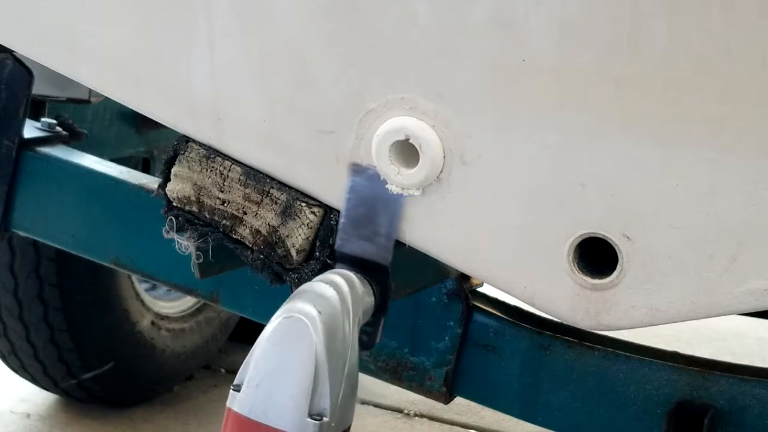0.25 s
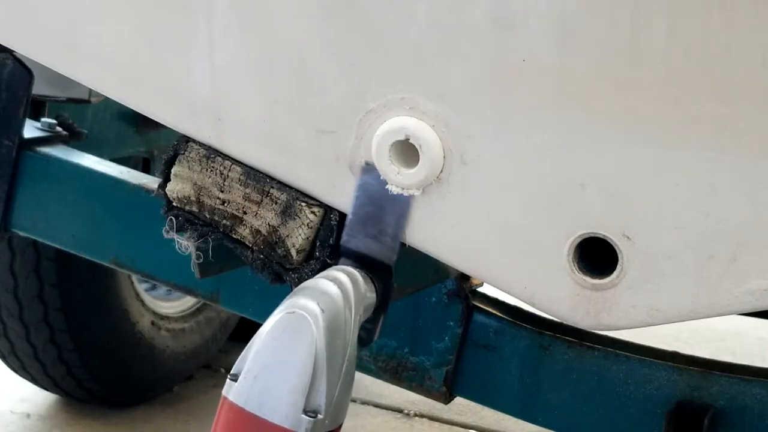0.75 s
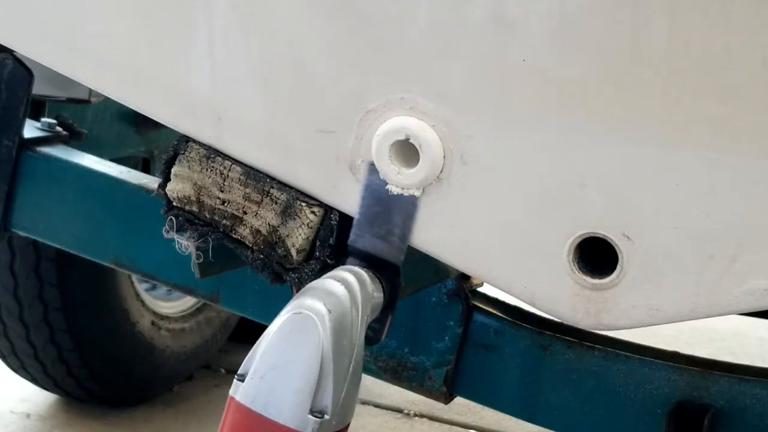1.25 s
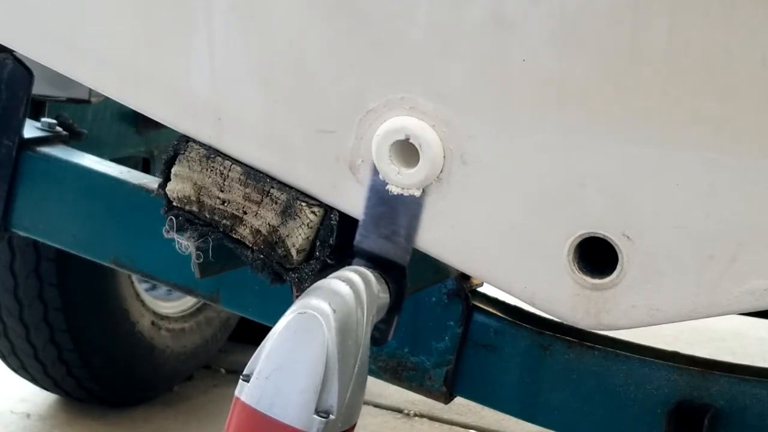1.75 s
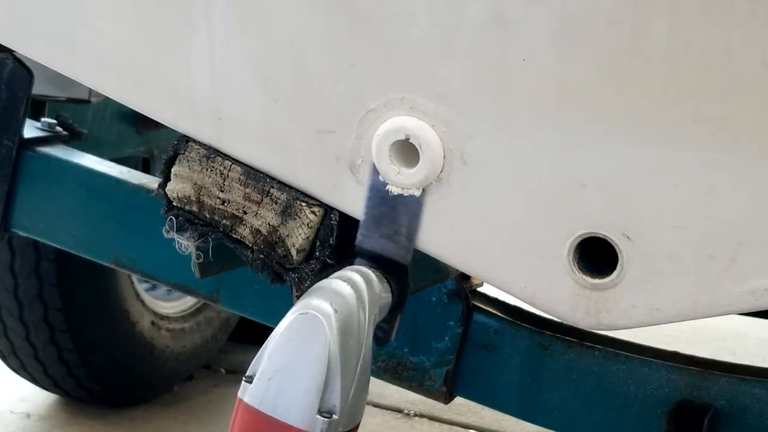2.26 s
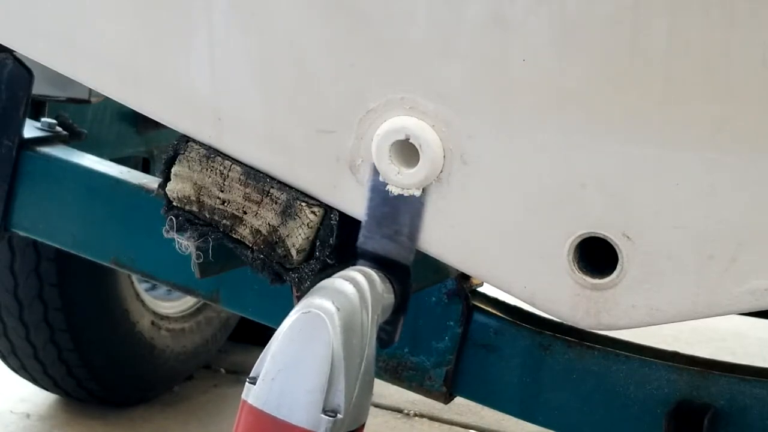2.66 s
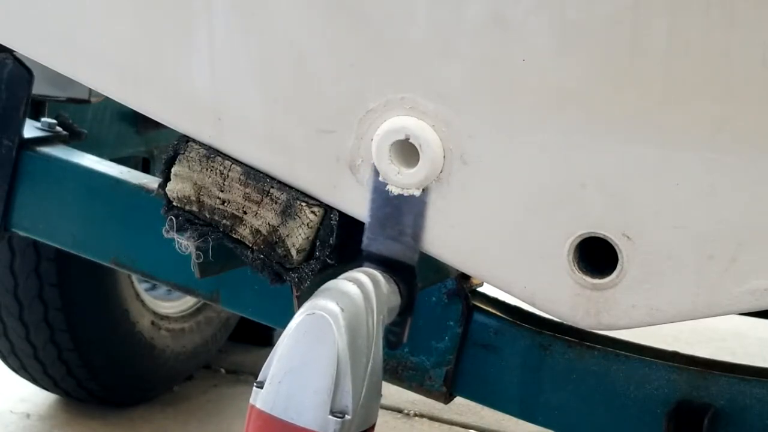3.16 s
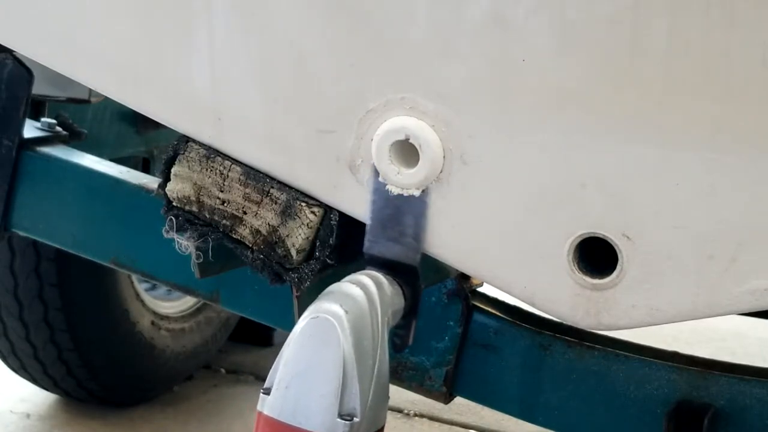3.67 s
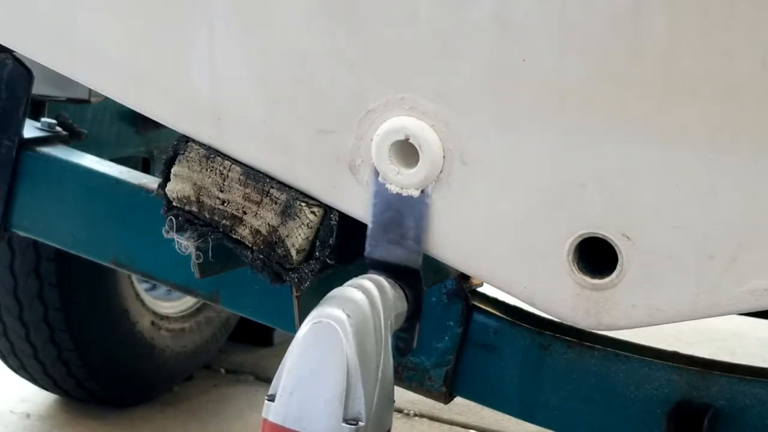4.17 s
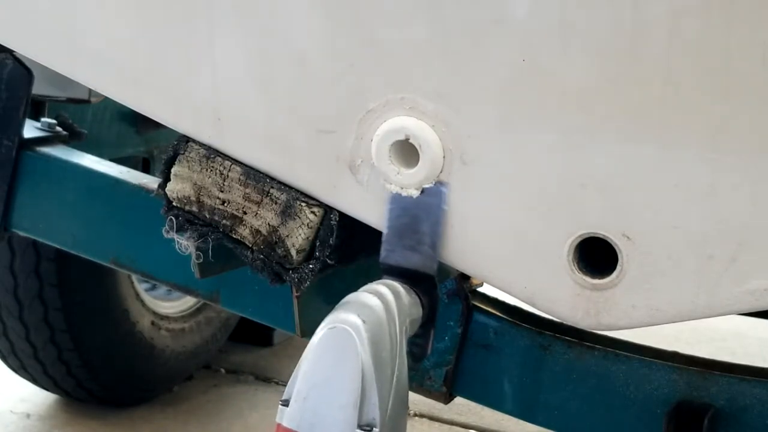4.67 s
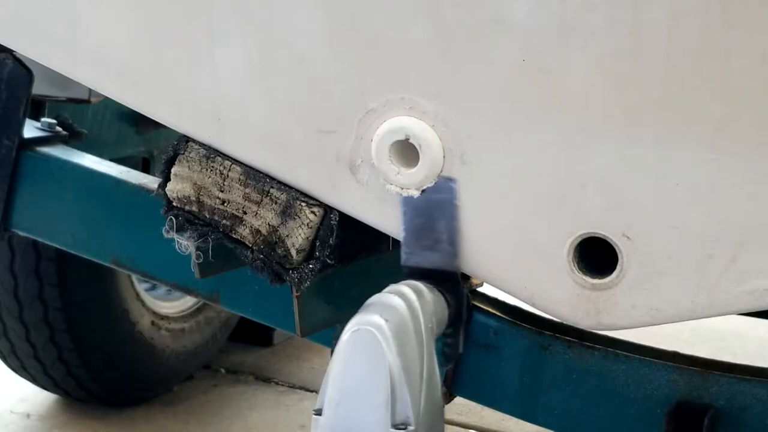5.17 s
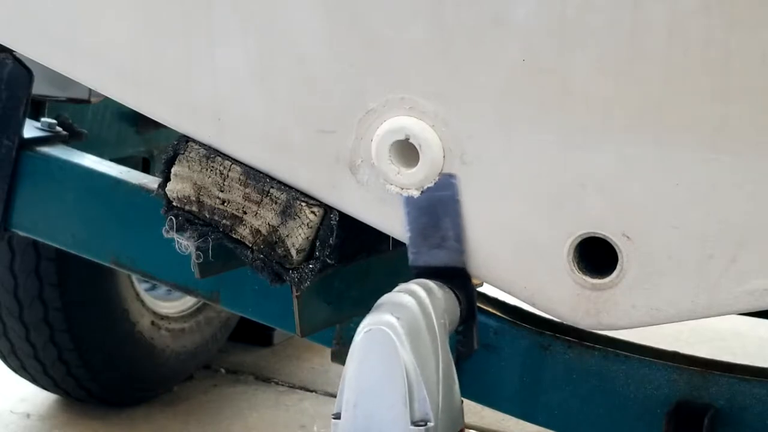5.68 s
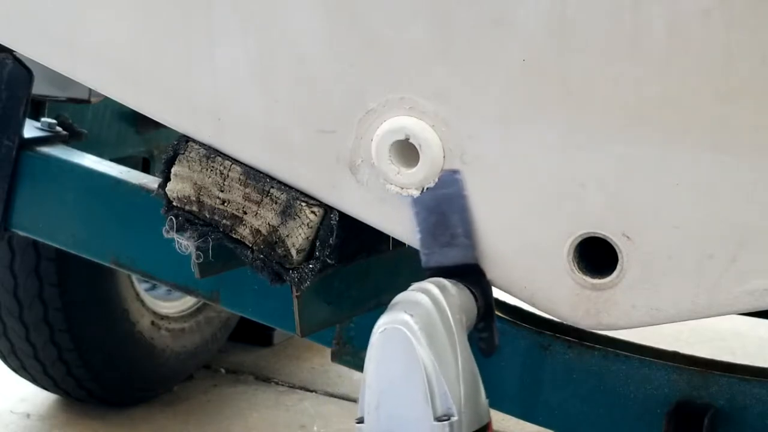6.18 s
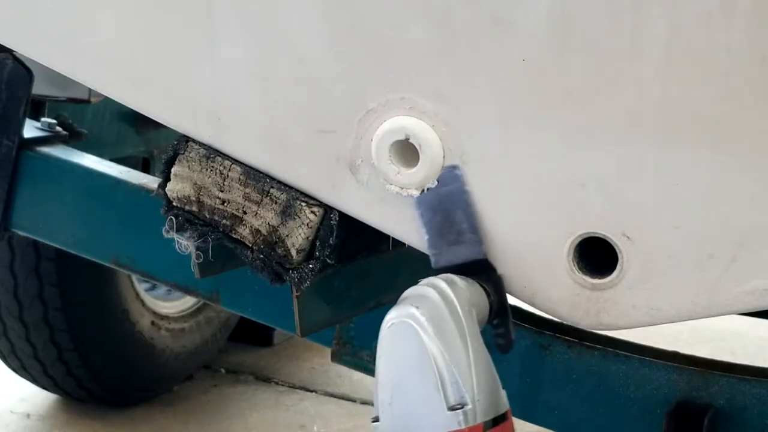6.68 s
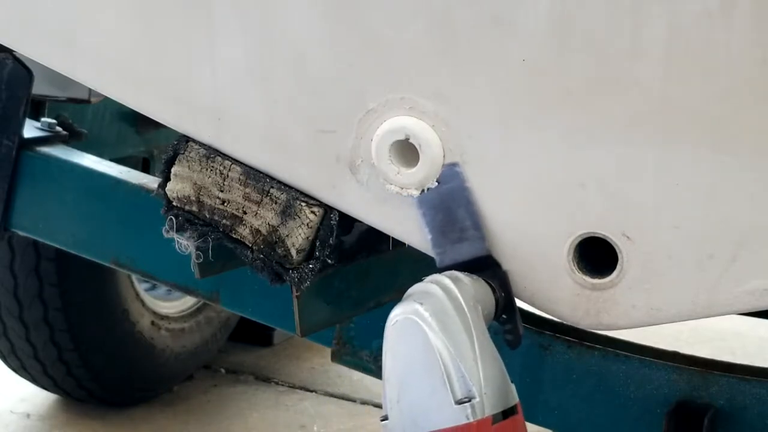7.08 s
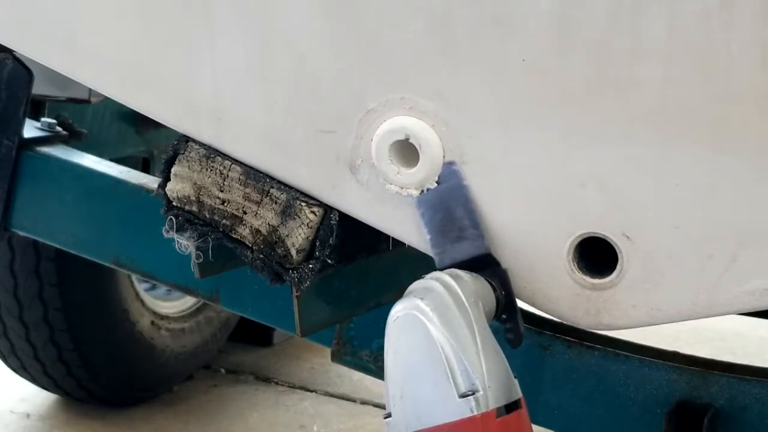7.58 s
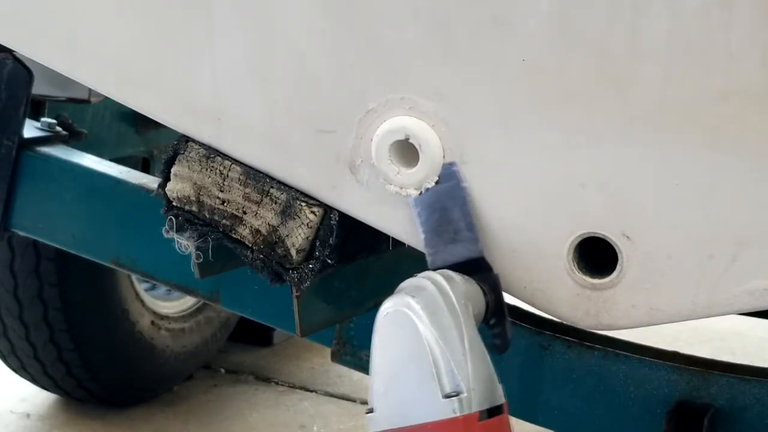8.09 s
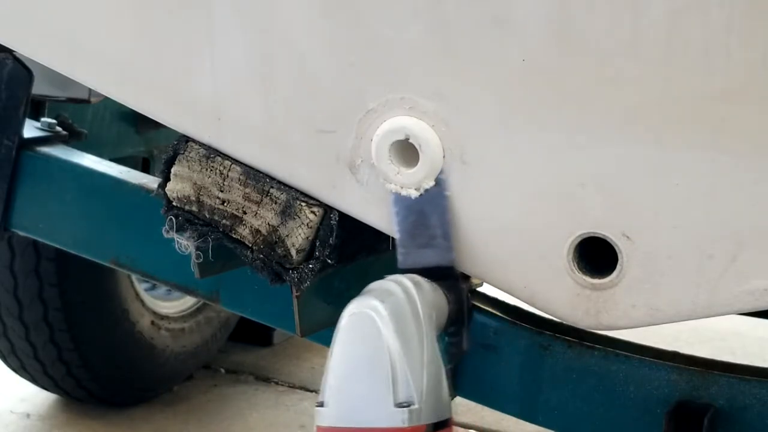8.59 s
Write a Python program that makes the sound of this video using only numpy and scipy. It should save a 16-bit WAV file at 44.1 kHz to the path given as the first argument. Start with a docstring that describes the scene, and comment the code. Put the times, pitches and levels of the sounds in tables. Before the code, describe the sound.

An oscillating multi-tool buzzes harshly against a hollow fiberglass hull, its pitch sagging under load, climbing back, then sagging again with raspy squeals.

```python
"""An oscillating multi-tool saws a plastic fitting off a fiberglass boat hull, outdoors.
Its teeth bite once on each push and pull; these impulses ring the hull, tool head and steel blade.
The blade's swing drives a low drone in the hull, friction gives a pulsing rasp, the motor whines.
Load drags the stroke rate down; it partly recovers, then sags again, and pitched parts glide with it.
At times the blade chatters or squeals, or single harmonics sing out."""
import sys
import numpy as np
from scipy import signal
from scipy.fft import rfft, irfft, next_fast_len
from scipy.io import wavfile
from scipy.ndimage import uniform_filter1d

SR = 44100
rng = np.random.default_rng(int(sys.argv[2]) if len(sys.argv) > 2 else 0)


def master(y):
    """Save y as 16-bit WAV."""
    cut = np.clip(np.atleast_2d(y).T, -1, 1)
    pcm = np.round(cut * 32767)  # scale
    wavfile.write(sys.argv[1], SR, pcm.astype(np.int16))


N = 389844

# Motor speed as it bogs down, then as it partly recovers and sags again.
# Each row: time in seconds, stroke rate in strokes per second.
BOGGING_DOWN = [(0.0, 245.0), (0.25, 248.2), (0.52, 247.3), (0.7, 242.2), (1.1, 217.1), (1.44, 189.0),
                (1.81, 164.6), (1.97, 158.1), (2.55, 140.3)]
RISE_AND_SAG = [(2.68, 140.5), (2.92, 144.2), (3.5, 146.8), (3.79, 157.6), (4.29, 182.6), (4.43, 199.6),
                (4.57, 213.5), (4.81, 222.6), (5.39, 226.6), (6.08, 218.2), (6.59, 217.1), (7.04, 219.0),
                (7.43, 214.8), (8.03, 197.2), (8.75, 188.5), (8.84, 188.6)]
# Pushes of the hand, each lasting until the next.
# Each row: start in seconds, change of the hull drone in dB, change of the buzz in dB.
PUSHES = [(0, 3.5, 1), (.68, -0.5, 1.5), (1.97, -11.5, 0), (2.4, -21, -0.5), (2.58, -7, 0), (4.33, -13, -5),
          (4.775, -1.5, 1), (7.3, 4.5, 0.3)]
# Friction in the cut. Each row: time in seconds, friction as a reference level in dB.
FRICTION = [(0.0, -42), (0.62, -40), (0.86, -32.5), (1.06, -36.5), (2.72, -38), (2.83, -37.5), (4.31, -39),
            (4.36, -47), (4.75, -43), (4.84, -36.5), (5.98, -33.5), (7.05, -34), (7.6, -35.5), (8.84, -38)]
# Spells in which the blade bounces in the slot.
# Each row: start in seconds, end in seconds, relative level in dB, scatter of the bites in strokes.
CHATTER = [(0, .62, -62, 0.0065), (2.15, 3.303, -51, 0.0019), (5.943, 6.3, -44, 0.0045),
           (7.14, 7.38, -42, 0.0076), (7.42, 7.72, -40.5, 0.0077)]
# Spells in which one harmonic sings out.
# Each row: start in seconds, end in seconds, multiple of the stroke rate, level in dB before SINGING_DB.
SINGING_SPELLS = [(.12, .58, 7, -36), (.3, .6, 9, -35), (.56, .79, 8, -30), (.84, 1.03, 8, -30.5),
                  (.85, .97, 9, -31), (1.0, 1.16, 7, -28.5), (1.02, 1.28, 3, -29), (1.17, 1.34, 11, -30),
                  (1.48, 1.99, 6, -29.5), (1.705, 1.87, 11, -27.5), (2.04, 2.26, 8, -33.5),
                  (2.086, 2.27, 13, -30), (2.22, 2.4, 9, -32.5), (2.42, 2.86, 13, -27),
                  (2.3, 3.62, 7, -32.3), (2.85, 3.55, 10, -34.5), (3.85, 4.0, 11, -31),
                  (3.96, 4.2, 13, -33), (4.15, 4.3, 27, -35), (4.78, 5.25, 6, -34), (4.79, 5.62, 7, -32),
                  (5.15, 5.62, 8, -32), (5.6, 5.9, 17, -35), (5.77, 6.11, 7, -28), (5.77, 6.2, 10, -31.5),
                  (5.8, 6.12, 25, -34.5), (6.33, 7.11, 20, -32), (6.5, 6.87, 10, -30.5),
                  (6.55, 6.84, 22, -31), (6.6, 7.3, 8, -32), (6.86, 7.35, 7, -30.5), (7.6, 7.75, 7, -30.5),
                  (7.68, 7.81, 23, -29), (7.73, 7.95, 10, -30.5), (7.8, 8.1, 11, -32.5),
                  (7.83, 8.06, 24, -34), (8.1, 8.7, 9, -27.8), (8.25, 8.52, 26, -34.5),
                  (8.41, 8.714, .5, -45.5)]
# Spells in which the pinched blade squeals. Each row: start in seconds, end in seconds, level in dB.
SQUEAL_SPELLS = [(6.33, 7.15, -34), (7.11, 7.44, -29), (7.41, 7.57, -40), (7.53, 7.8, -31.5),
                 (7.78, 8.84, -40)]
# Resonances of hull, tool head, blade, squealing steel and teeth, then low ones of the hull panel.
# Each row: centre in Hz, width in Hz, relative gain in dB.
HULL_MODES = [(683, 140, -2), (1020, 47, 4.5), (1254, 67, 4.5)]
HEAD_MODES = [(1558, 80, 2.5), (1822, 120, 1.5), (2219, 128, 2.5), (2634, 720, -7.5), (3010, 230, -3.5),
              (4160, 1300, -12)]
BLADE_MODES = [(4350, 240, -6), (4934, 200, 0), (6000, 2100, -12.5)]
SQUEAL_MODES = [(4680, 310, 0.081), (4760, 260, -0.82)]
TOOTH_MODES = [(9760, 350, 2), (10585, 104, 5), (12970, 380, 6.7)]
PANEL_MODES = [(143.7, 11.7, -11.5), (175.8, 36.9, -19), (194.5, 53.5, -20.5), (288, 50, -28),
               (461, 15, -42), (586.4, 84, -36), (681.2, 84, -25), (848.5, 91, -21), (898.3, 36, -18)]
# Swing of the blade, one row for each harmonic from 1 to 4.
# Each row: drive into the hull in dB, level straight from the tool in dB, unsteadiness in dB.
SWING = [(0, -51.5, -48.5), (0, -50.5, -56), (2.5, -45.5, -56), (-9, -51.5, -52)]
# Spectral shapes of the friction noises. Each row: frequency in Hz, relative density in dB per Hz.
GRIND_SPECTRUM = [(30, -18), (170, -11.5), (330, -17.5), (520, -0.5), (850, -0.5), (1900, 2.5), (3800, -2),
                  (4700, -3), (5400, -21), (7200, -21), (15000, -27)]
DUST_SPECTRUM = [(4000, -12), (5600, -1.5), (7300, -12.5), (8600, -9.5), (9700, 0), (10400, -1), (10630, 2),
                 (11000, -5.5), (12200, -6.5), (12850, -14), (13300, -12), (15600, -20)]
# Likeness of left and right noise. Each row: frequency in Hz, correlation.
LIKENESS = [(100, .97), (600, 0.15), (1400, 0.31), (6000, 0.33), (15000, 0.43)]

FREE_HZ, BOGGED_HZ = 248, 140   # stroke rate with no load and with full load
WHINE_RATIO = 2.6   # whine frequency over stroke rate
USUAL_FRICTION_DB = -37
HULL_DB, HULL_LOAD_DB = -38, 6   # with no load; gain at full load
HEAD_DB, HEAD_FOLLOWS = -29.5, 0.49   # at usual friction; dB per dB of friction
BLADE_DB, BLADE_FOLLOWS = -35, 1.16   # the same for the blade, before its stereo spread
GRIND_DB, GRIND_LOAD_DB = -30.8, -6   # with no load; change at full load
DUST_DB = 1.5   # above the friction level
SCRATCH_DB = 7.5   # extra grinding, above the level of the chatter
SINGING_DB = -0.5   # trim common to all singing spells
PUSH_CHANGE_S, BITE_CHANGE_S = 0.17, 0.031   # the teeth grip and let go faster than the hull settles
SPELL_EDGE_S, SING_SETTLE_S = 0.032, .04   # window edges; averaging of a harmonic
SING_FADE_SHARE = .18   # the last part of each singing spell dies away
CUTOFF_HZ = 15600


def from_db(db):
    """An amplitude ratio is ten to the power of its decibels over twenty."""
    return 10 ** (np.asarray(db) / 20)


def rms_one(x):
    """Division by the root mean square gives unit power."""
    return x / np.sqrt(np.mean(x ** 2) + 1e-20)


def in_time(rows):
    """Linear interpolation gives each column of a curve at every sample."""
    s, *columns = np.transpose(rows)
    return [np.interp(np.arange(N) / SR, s, c) for c in columns]


def at_hz(points, hz):
    """A spectrum is interpolated on a log-frequency axis."""
    points = np.array(points)
    return np.interp(np.log(hz + 1e-9), np.log(points[:, 0]), points[:, 1])


def drift(rate):
    """White noise through a double-pole low-pass at rate Hz is slow random variation of unit power."""
    r = np.exp(-80 * np.pi * rate / SR)   # one step is 40 samples
    white = rng.standard_normal(N // 40 + 2002)
    slow = signal.lfilter([1], [1, -2 * r, r * r], white)[2000:]   # drop the filter's onset
    return np.interp(np.arange(N) / 40, np.arange(len(slow)), rms_one(slow))


def band(x, low_hz, high_hz, order=2):
    """A Butterworth band-pass has a maximally flat pass band."""
    edges = [low_hz, min(high_hz, .45 * SR)]
    return signal.sosfilt(signal.butter(order, edges, "band", fs=SR, output="sos"), x)


def resonate(x, modes, sway_db=0):
    """Parallel resonances of alternating sign respond; each is struck more or less as the blade shifts."""
    out = 0
    for k, (hz, width, db) in enumerate(modes):
        r = np.exp(-np.pi * width / SR)   # pole radius sets the decay
        gain = (-1) ** k * from_db(db + sway_db * drift(7.5)) * (1 - r * r) / 2
        ring = signal.lfilter([1, 0, -1], [1, -2 * r * np.cos(2 * np.pi * hz / SR), r * r], x)
        out = out + gain * ring
    return out


def at_level(x, db):
    """Division by the running power of the stereo centre fixes its short-term level at db."""
    power = uniform_filter1d(x.mean(axis=0) ** 2, size=3000)
    return x * from_db(db) / np.sqrt(np.abs(power) + 1e-14)


def noise(spectrum, gate):
    """Gated noise is coloured in frequency; adding and subtracting a side part sets its correlation."""
    size = next_fast_len(N)
    hz = np.arange(size // 2 + 1) * SR / size
    mid, side = rfft(rng.standard_normal((2, N)) * gate, size)
    alike = np.clip(at_hz(LIKENESS, hz), 0, 1)
    both = mid + np.sqrt((1 - alike) / (1 + alike)) * side * [[1], [-1]]
    return irfft(both * from_db(at_hz(spectrum, hz)), size)[:, :N]


def pan(db):
    """A level difference between the channels, left minus right, shifts the image."""
    return from_db(np.array([[db], [-db]]) / 2)


def during(start, end):
    """A trapezoidal window has short soft edges."""
    t = np.arange(N) / SR
    return np.clip(np.minimum(t - start, end - t) / SPELL_EDGE_S, 0, 1)


def spells(rows):
    """Windows scaled by their levels sum to the gain of an intermittent sound."""
    return sum(from_db(db) * during(start, end) for start, end, db, *_ in rows)


def load(turns):
    """The fall in motor speed measures the load, from 0 when free to 1 when fully bogged down."""
    return np.clip((FREE_HZ - np.gradient(turns) * SR) / (FREE_HZ - BOGGED_HZ), 0, 1)


def pushes():
    """Contact force alters the drone and buzz levels in dB: each push holds, then eases into the next."""
    rows = np.array(PUSHES)
    current = np.searchsorted(rows[1:, 0], np.arange(N) / SR)
    drone_db, buzz_db = rows[current, 1:].T
    drone_db = uniform_filter1d(drone_db, size=int(PUSH_CHANGE_S * SR))
    return drone_db, uniform_filter1d(buzz_db, size=int(BITE_CHANGE_S * SR))


def catches(turns, place, jitter, wander, rough, loose=0):
    """A periodic impulse train: one click per stroke, at a phase (in strokes) that creeps and trembles."""
    stroke = np.arange(int(turns[-1]))
    chance = rng.standard_normal((2500, 2))[:len(stroke)]
    start = np.interp(stroke, turns, np.arange(N)).astype(int)
    tremble = (jitter + loose * np.ones(N))[start] * chance[:, 0]
    when = stroke + place + wander * drift(2.93)[start] + tremble
    at = np.clip(np.interp(when, turns, np.arange(N)), 0, N - 2)
    force = 1 + rough * chance[:, 1]
    # each click is shared between two samples to keep its exact time
    whole, part = at.astype(int), at % 1
    return np.bincount(whole, force * (1 - part), N) + np.bincount(whole + 1, force * part, N)


def motor(turns):
    """Rotation gives a wavering bearing whine above the stroke rate; its amplitude grows steeply with speed."""
    phase = 2 * np.pi * WHINE_RATIO * turns + 0.67 * drift(2.3)
    speed_gain = (np.gradient(turns) * SR / 220) ** 4.9
    return from_db(-41.0 + 2 * drift(1.7)) * speed_gain * np.sin(phase)


def panel_gain(hz):
    """Forced response of the hull: neighbouring resonances of opposite sign cancel in between."""
    gain = 0
    for k, (centre_hz, width, db) in enumerate(PANEL_MODES):
        gain = gain + (-1) ** k * from_db(db) / (1 + (2 * (hz - centre_hz) / width) ** 2)
    return gain


def drone(turns):
    """Forced vibration: the swinging blade bends the hull at four harmonics that swell near resonance."""
    speed, (push_db, _) = np.gradient(turns) * SR, pushes()
    out = 0
    for k, (hull_db, direct_db, unsteady_db) in enumerate(SWING, 1):
        steady = np.hypot(from_db(hull_db + push_db) * panel_gain(k * speed), from_db(direct_db))
        gain = steady + from_db(unsteady_db) * drift(8.0)   # the hand's pressure is unsteady
        spread = 0.067 * k * np.array([[1], [-1]])   # higher orders arrive less in step
        phase = 2 * np.pi * (k * turns + rng.random()) + 0.0097 * k * drift(36) + spread
        flicker = from_db(0.26 * k * drift(45))
        out = out + np.sqrt(2) * gain * flicker * np.sin(phase)
    return out


def chatter(turns):
    """Repeated impact: a bouncing blade thumps the hull unevenly, swayed by alternate strokes, and clicks."""
    alternation = drift(107) + 0.55 * np.sin(np.pi * turns)
    hits = catches(turns, place=0.498, jitter=0.034, wander=0.048, rough=0.27) * alternation
    thumps = resonate(hits, [(136, 54, 6.4), (299, 44, 6.1), (543, 150, 0.5)])
    both = rms_one(band(thumps, 90, 770)) + 1.4 * rms_one(band(hits, 820, 2700))
    return spells(CHATTER) * from_db(2 * drift(5.1)) * both


def squeal(turns):
    """Stick-slip: the pinched blade slips unevenly on push and pull; each slip rings the steel briefly."""
    push = catches(turns, place=0.1014, jitter=0.0503, wander=0.037, rough=0.39)
    pull = catches(turns, place=.55, jitter=0.055, wander=0.022, rough=.7)
    slips = push + 0.52 * pull * np.array([[1], [-1]])
    ringing = rms_one(band(resonate(slips, SQUEAL_MODES), 4330, 4860))
    return ringing * spells(SQUEAL_SPELLS) * from_db(2.0 * drift(17))


def rasp(turns, bites):
    """Sliding friction makes noise that swells twice a stroke; the finest tooth ringing follows the bites."""
    dust_db = DUST_DB + in_time(FRICTION)[0]
    loaded = from_db(GRIND_DB + GRIND_LOAD_DB * load(turns))
    scratching = from_db(SCRATCH_DB) * spells(CHATTER)
    pulse_db = 2.5 * np.cos(4 * np.pi * turns) + 1.0 * np.cos(2 * np.pi * turns)
    gate = from_db(pulse_db + 0.92 * drift(35))
    grind = rms_one(noise(GRIND_SPECTRUM, gate)) * np.hypot(loaded, scratching)
    ringing = rms_one(band(resonate(bites, TOOTH_MODES, sway_db=2.5), 7760, 12070, order=3))
    dust = rms_one(noise(DUST_SPECTRUM, gate)) + from_db(-3) * ringing
    return grind + dust * from_db(dust_db + 0.53 * drift(7.1)) * pan(-1.0)


def scatter(x):
    """Reflection in hull and trailer adds short echoes; interference makes harmonics flare as pitch glides."""
    out = x.copy()
    lags = (rng.uniform(.001, .012, 8) * SR).astype(int)
    for lag, sign in zip(lags, rng.choice([-1, 1], 8)):
        out[:, lag:] += sign * rng.normal(0.36, 0.4, (2, 1)) * x[:, :-lag]
    return out


def teeth(turns):
    """Impulsive excitation: teeth bite on push and pull, less evenly while the blade bounces."""
    loose = sum(spread * during(start, end) for start, end, _, spread in CHATTER)
    push = catches(turns, place=0, jitter=.0006, wander=.004, rough=.05, loose=loose)
    pull = catches(turns, place=.42, jitter=0.0029, wander=0.029, rough=0.028, loose=loose)
    knock = catches(turns, place=0.2262, jitter=0.0015, wander=0.031, rough=0.15, loose=loose)
    sideways = knock * np.array([[1], [-1]])   # opposite sign at the two ears
    return scatter(push - 0.6 * pull + 0.85 * sideways)


def buzz(turns, bites):
    """Resonance: bites ring hull, head and blade; the hull swells with load, the steel with friction."""
    _, push_db = pushes()
    friction_db = in_time(FRICTION)[0] - USUAL_FRICTION_DB
    hull_db = HULL_DB + push_db + HULL_LOAD_DB * load(turns)
    head_db = HEAD_DB + push_db + HEAD_FOLLOWS * friction_db
    blade_db = BLADE_DB + BLADE_FOLLOWS * friction_db

    hull = band(resonate(bites, HULL_MODES, sway_db=2.0), 750, 1740, order=3)
    hull = at_level(hull, hull_db + drift(0.6))

    head = band(resonate(bites, HEAD_MODES, sway_db=1.5), 1250, 4530, order=3)
    bright = from_db(-12.5 + 1.5 * friction_db) * band(head, 2610, 4240)   # harder bites are brighter
    head = at_level(head + bright, head_db + drift(18))

    blade = band(resonate(bites, BLADE_MODES, sway_db=3.5), 4060, 5780, order=3)
    blade = at_level(blade, blade_db + 0.72 * drift(4.6))
    blade = 0.73 * blade + 0.13 * blade[::-1]   # the small blade is a narrow source
    return hull * pan(0.41) + head * pan(1.14) + blade


def singing(turns, sound):
    """Locking: a buzz harmonic, or the blade's half-rate rocking, is held on a sharp resonance."""
    out = sound.copy()
    waver = from_db(SINGING_DB + .9 * drift(7.6)) * np.exp(.25j * drift(8.6))
    for start, end, harmonic, db in SINGING_SPELLS:
        part = slice(int(start * SR), int(end * SR))
        carrier = np.exp(2j * np.pi * harmonic * turns[part])
        # the harmonic already present, as a slowly varying complex amplitude
        shifted = 2 * sound[:, part].mean(axis=0) / carrier
        free = uniform_filter1d(shifted, size=int(SING_SETTLE_S * SR))
        held = np.sqrt(2) * from_db(db) * waver[part] * np.exp(1j * np.angle(free.mean()))
        fade = np.minimum(np.linspace(1, 0, len(carrier)) / SING_FADE_SHARE, 1)
        # the held tone takes the place of the free one
        out[:, part] += during(start, end)[part] * fade * np.real((held - free) * carrier)
    return out


def scene():
    """Superposition: all parts follow the phase of one motor, counted in strokes, and add linearly."""
    turns = np.cumsum(in_time(BOGGING_DOWN + RISE_AND_SAG)[0]) / SR
    bites = teeth(turns)
    background = motor(turns) + chatter(turns) + squeal(turns) + rasp(turns, bites)
    return background + singing(turns, drone(turns) + buzz(turns, bites))


def record(dry):
    """A tenth-order elliptic low-pass cuts the top steeply."""
    return signal.sosfilt(signal.ellip(10, .1, 80, CUTOFF_HZ, fs=SR, output="sos"), dry)


dry = scene()
out = record(dry)
master(out)
```